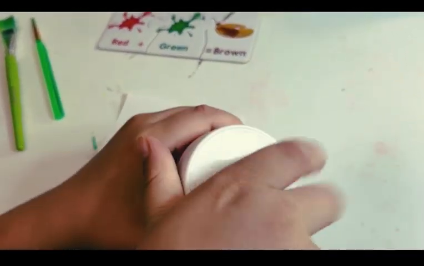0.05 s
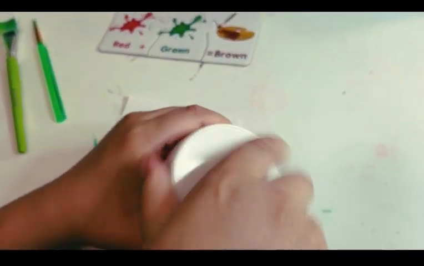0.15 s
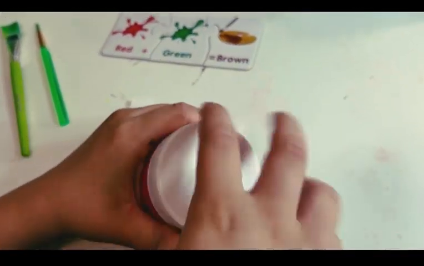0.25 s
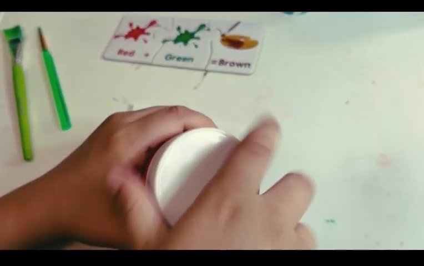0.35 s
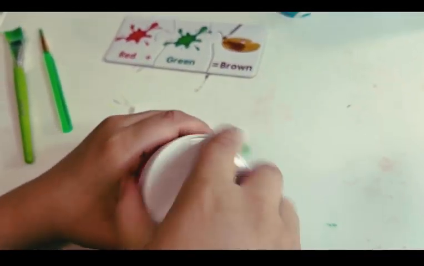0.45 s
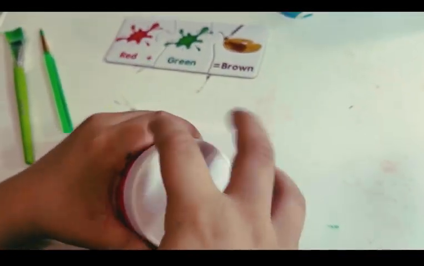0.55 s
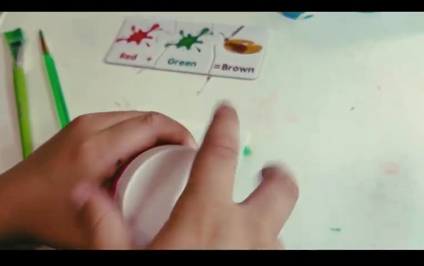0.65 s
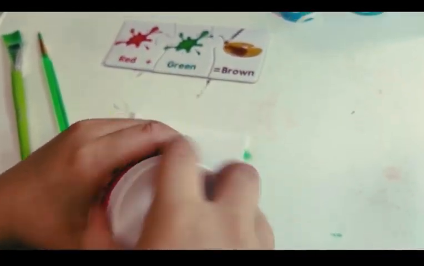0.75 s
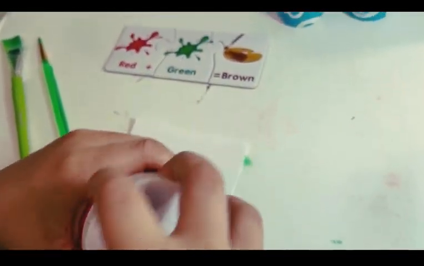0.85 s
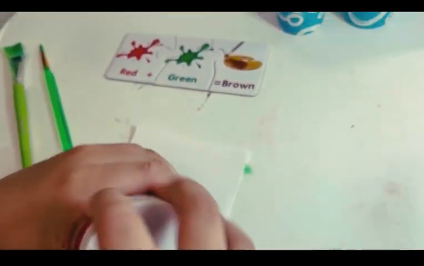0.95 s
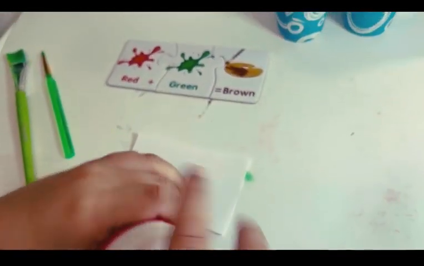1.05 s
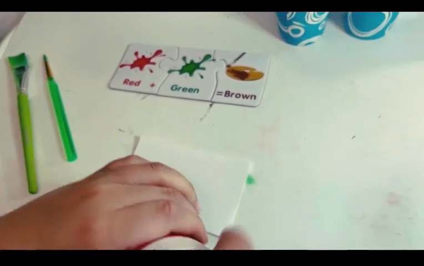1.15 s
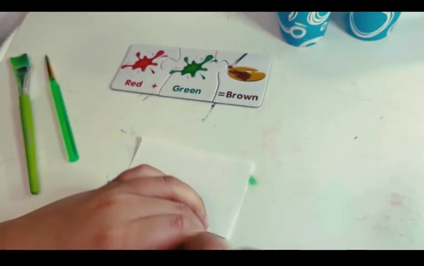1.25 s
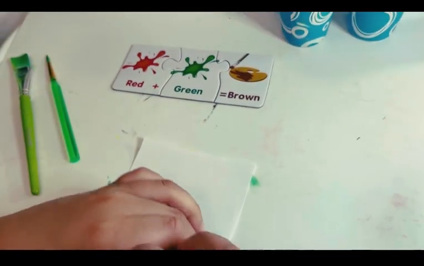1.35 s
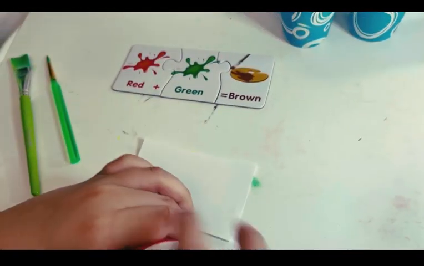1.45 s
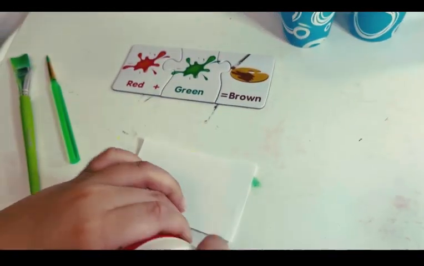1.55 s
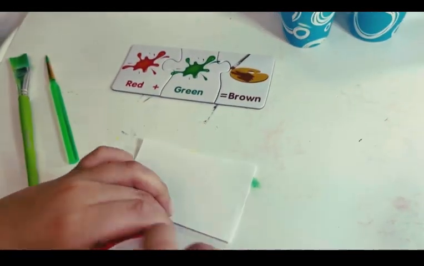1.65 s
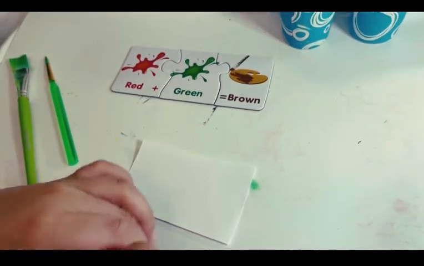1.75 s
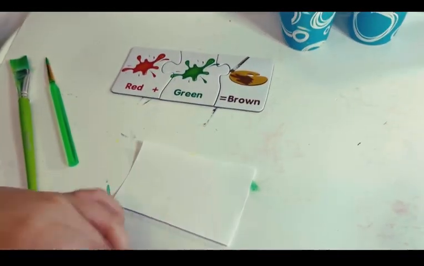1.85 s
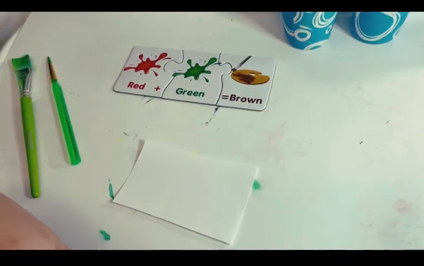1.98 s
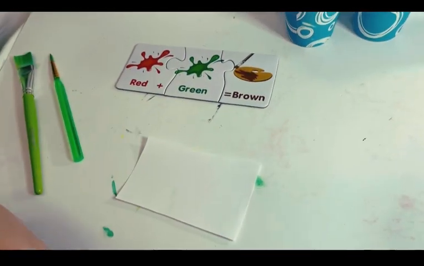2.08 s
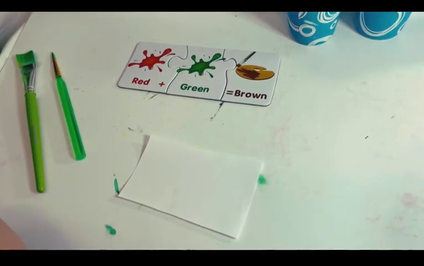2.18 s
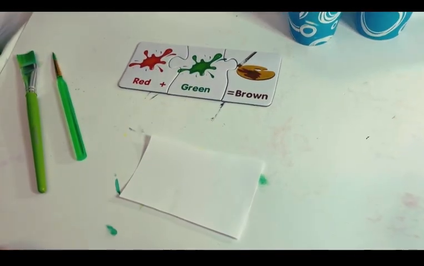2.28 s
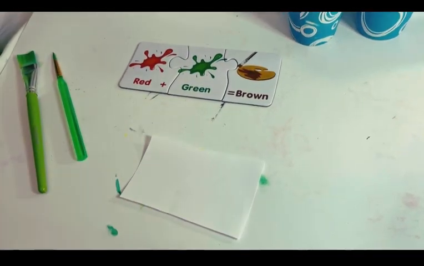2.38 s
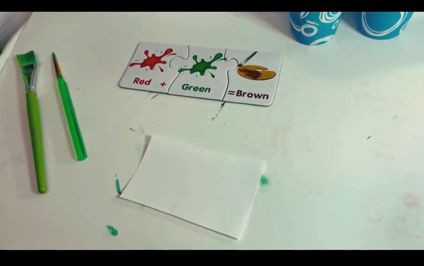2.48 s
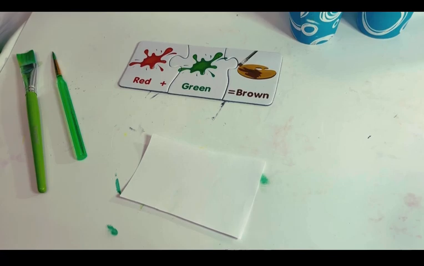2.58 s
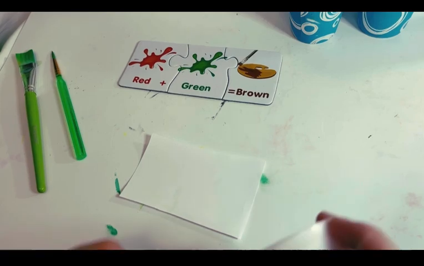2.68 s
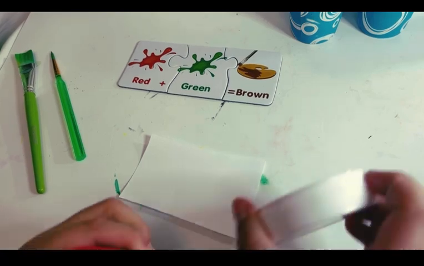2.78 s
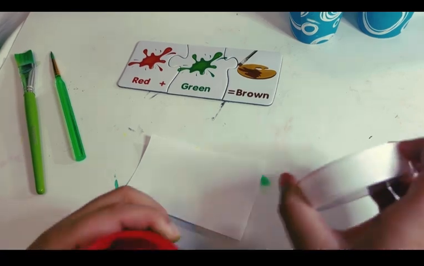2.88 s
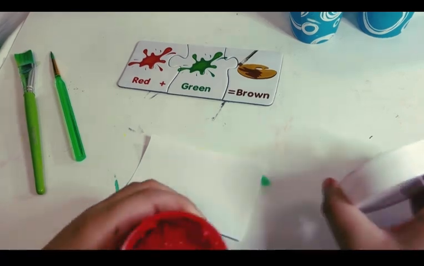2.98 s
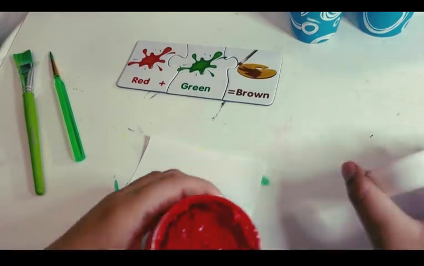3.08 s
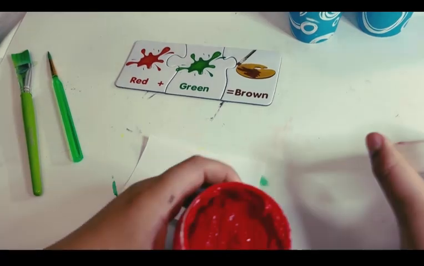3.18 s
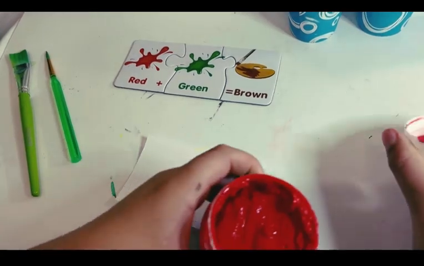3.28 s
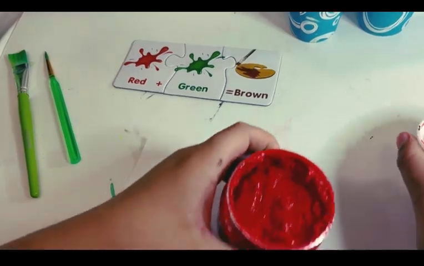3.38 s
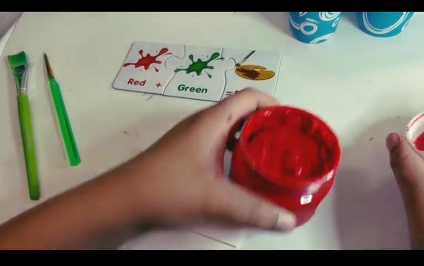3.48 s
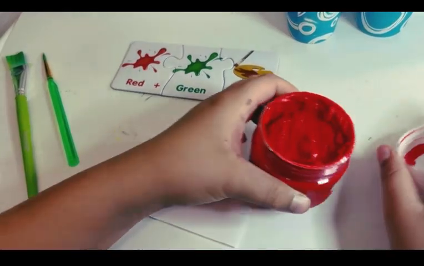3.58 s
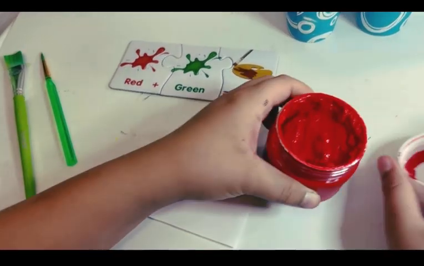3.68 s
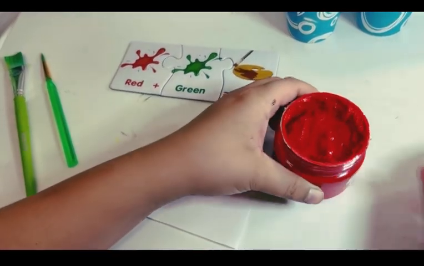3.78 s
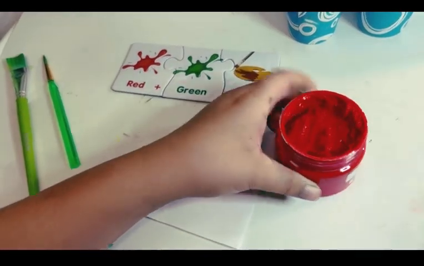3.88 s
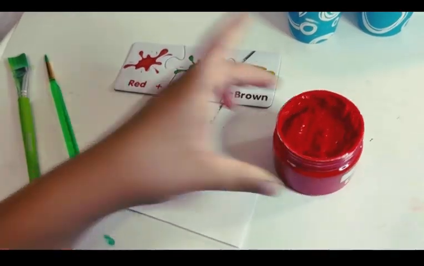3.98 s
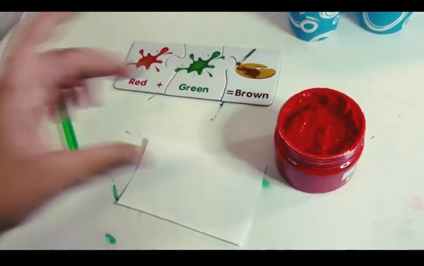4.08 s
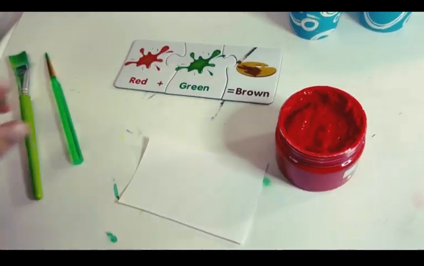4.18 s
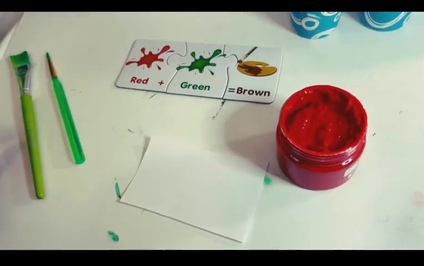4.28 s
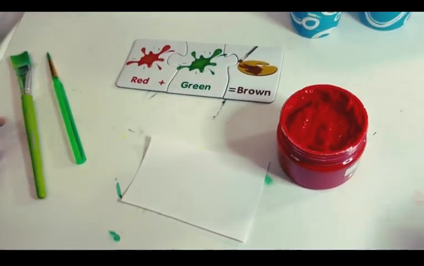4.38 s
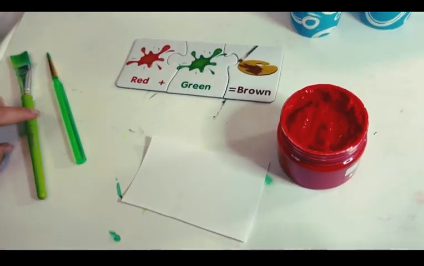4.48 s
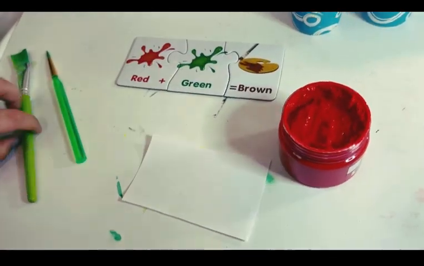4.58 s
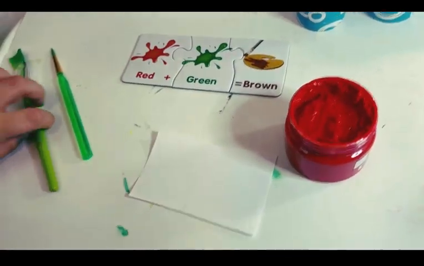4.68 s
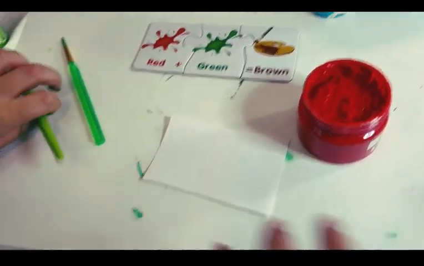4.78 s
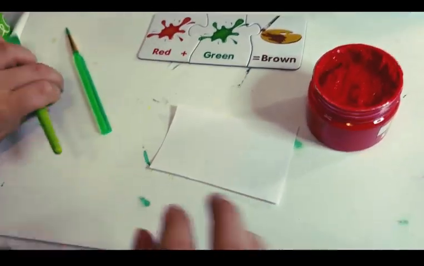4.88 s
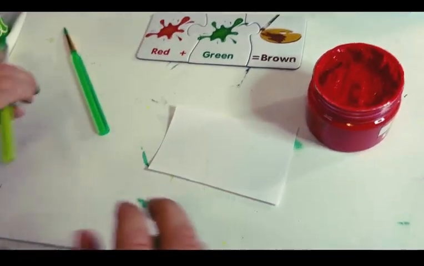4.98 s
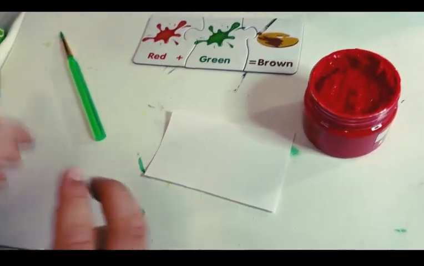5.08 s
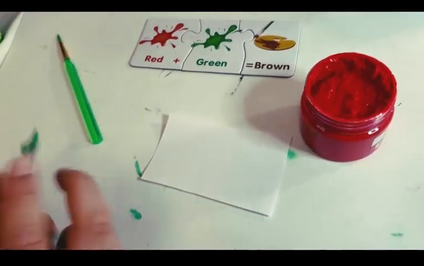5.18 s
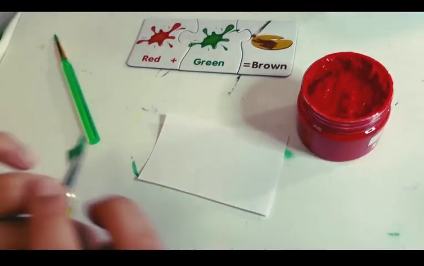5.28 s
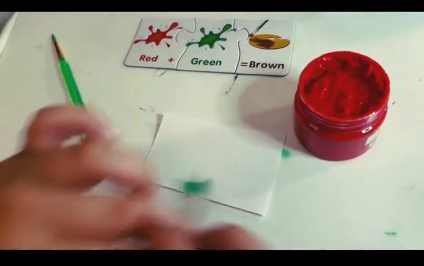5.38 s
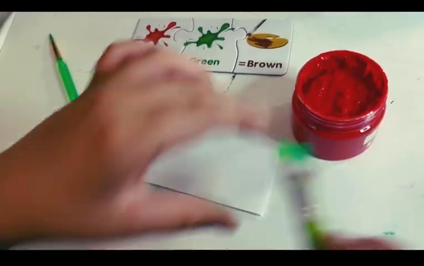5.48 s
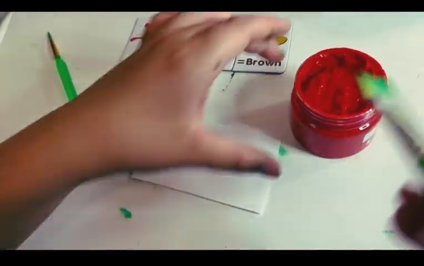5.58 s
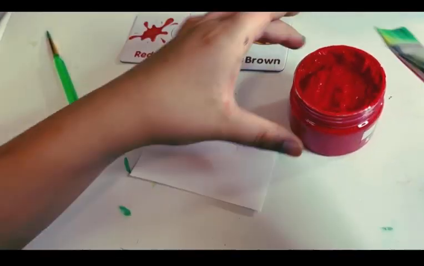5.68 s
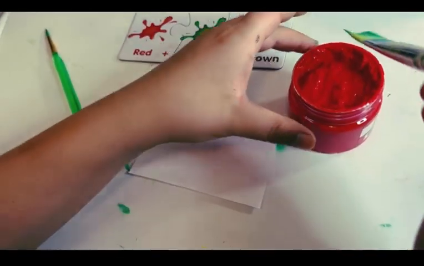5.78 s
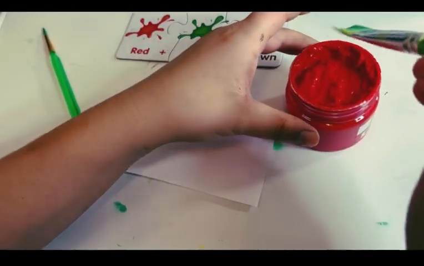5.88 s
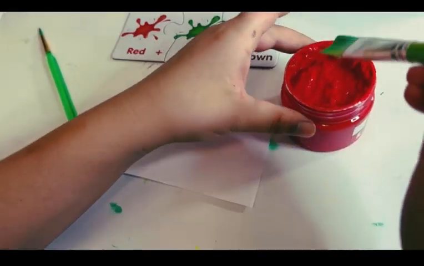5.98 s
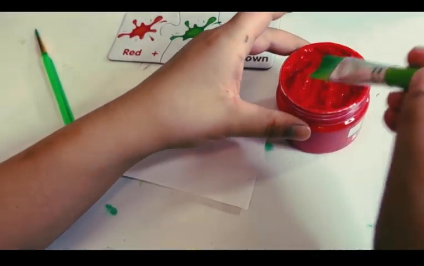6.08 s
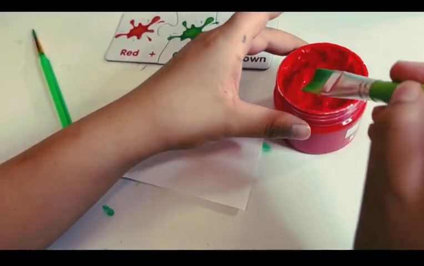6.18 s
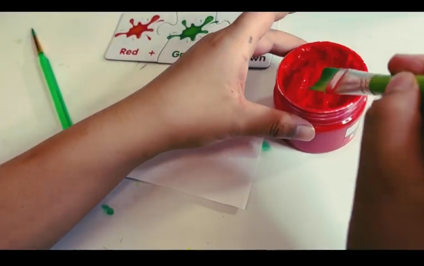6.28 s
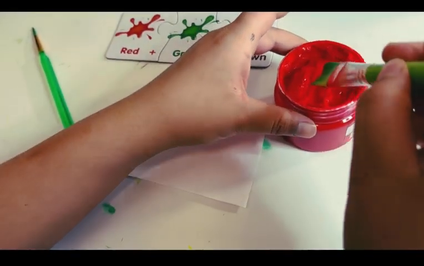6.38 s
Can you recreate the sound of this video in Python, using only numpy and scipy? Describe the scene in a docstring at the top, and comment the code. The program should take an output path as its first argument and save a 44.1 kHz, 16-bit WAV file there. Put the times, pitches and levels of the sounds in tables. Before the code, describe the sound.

Close, dry plastic snaps and thread rubbing as a jar lid is unscrewed, a short sticky crackle, then faint slides, taps and table bumps.

```python
"""Over quiet room tone the thread of a plastic screw lid rubs, then sticks and snaps free on a paint jar.
The jar stands on a table in a small room, close to a stereo microphone.
The lid peels off the wet rim with a short crackle; then hands slide over the table, the jar is set down
and a brush is picked up and dipped in. Rubs are coloured noise; snaps, pops, taps and knocks are
noise bursts and ringing modes, sent into the room."""
import sys
import numpy as np
from scipy import signal
from scipy.fft import rfft, irfft, next_fast_len
from scipy.io import wavfile

SR = 44100
rng = np.random.default_rng(int(sys.argv[2]) if len(sys.argv) > 2 else 0)


def to_wav(sig):
    """Store sig (one row per channel, or 1-D mono) as 16-bit WAV at the path in sys.argv[1].

    Samples outside -1..1 are clipped; the rate is SR.
    """
    pcm = np.clip(np.atleast_2d(sig), -1, 1) * 32767
    pcm = np.round(pcm).astype(np.int16)
    wavfile.write(sys.argv[1], SR, pcm.T)  # frames by channels


N = 284223
TIME = np.arange(N) / SR
FFT_SIZE = next_fast_len(N, real=True)
HZ = np.maximum(np.fft.rfftfreq(FFT_SIZE, 1 / SR), 1)
HIT_SIZE = 8192  # samples given to each short sound
HIT_TIME = np.arange(HIT_SIZE) / SR
HIT_HZ = np.maximum(np.fft.rfftfreq(HIT_SIZE, 1 / SR), 1)


def from_db(db):
    """Decibels to gain."""
    return 10 ** (np.asarray(db) / 20)


def rms_one(x):
    """Scale to rms 1."""
    return x / np.sqrt(np.mean(x ** 2) + 1e-20)


def burst_one(x):
    """Scale a short sound to the energy of 20 ms at rms 1."""
    return x / np.sqrt(np.sum(x ** 2) / (0.02 * SR))


def at_hz(points, hz):
    """Read a table on a log-frequency axis."""
    f, value = np.transpose(points)
    return np.interp(np.log(hz), np.log(f), value)


def resonances(modes, hz):
    """Magnitude response of (f/Hz, width/Hz, level/dB) resonances, summed in power."""
    power = 0
    for f, width, db in modes:
        detuning = (hz / f - f / hz) * f / width
        power = power + from_db(db) ** 2 / (1 + detuning ** 2)
    return np.sqrt(power)


def drift(rate_hz):
    """Slow random wander with spread 1, fading out above the rate."""
    spectrum = rfft(rng.standard_normal(FFT_SIZE)) / (1 + (HZ / rate_hz) ** 2)
    return rms_one(irfft(spectrum, FFT_SIZE)[:N])


def add(track, sound, s):
    """Mix a short sound in at time s."""
    i = max(round(s * SR), 0)
    track[..., i:i + sound.shape[-1]] += sound[..., :N - i]


# stereo width of diffuse sound at the microphone: f/Hz, side over mid level/dB
STEREO_WIDTH = [(60, -15.5), (200, -10.5), (400, -4.5), (700, -1), (1300, 0), (3000, -5), (4500, -4.5),
                (7000, 1), (14000, -4)]


def stereo_noise(colour, grain_db=0.0):
    """Coloured noise with its own width per frequency; grain makes it a stream of uneven tiny contacts."""
    contact_db = grain_db * np.clip(rng.standard_normal(N // 24 + 1), -3, 3)
    contact = np.repeat(from_db(contact_db), 24)[:N]  # each contact lasts 24 samples
    mid, side = rfft(rng.standard_normal((2, N)) * contact, FFT_SIZE) * colour
    side = side * from_db(at_hz(STEREO_WIDTH, HZ))
    mid, side = irfft([mid, side], FFT_SIZE)[:, :N]
    return np.array([mid + side, mid - side]) / np.std(mid)


def stroke(start, length, db, attack_s, release_s):
    """Gain of one movement of the hand: it swells, holds and dies away."""
    before = np.maximum(start - TIME, 0)
    after = np.maximum(TIME - start - length, 0)
    return from_db(db) * np.exp(-np.minimum(before / attack_s + after / release_s, 20))


def strokes(rows, attack_s, release_s):
    """Dull and bright gains of a series of movements; sharpness shifts weight from the one to the other."""
    dull = bright = 0
    for start, length, db, sharp_db in rows:
        gain = stroke(start, length, db, attack_s, release_s)
        dull = np.hypot(dull, gain / from_db(sharp_db))
        bright = np.hypot(bright, gain * from_db(sharp_db))
    return dull, bright


# colour of the quiet room, only its shape counts: f/Hz, level/dB
ROOM_TONE_COLOUR = [(15, -36.5), (25, -2.5), (80, 4), (270, -0.5), (405, -11.5), (624, -17.5),
                    (1160, -21.5), (1740, -28), (6210, -37.5), (7310, -40.5), (8360, -64), (9320, -35.5),
                    (11300, -34), (13600, -40), (16000, -65)]


def room_tone(level_db=-64.5, waver_db=1.5):
    """The quiet room under everything: coloured noise whose level wavers slightly."""
    colour = from_db(at_hz(ROOM_TONE_COLOUR, HZ))
    return from_db(level_db + waver_db * drift(8)) * stereo_noise(colour)


# turns of the lid by hand: start t/s, length t/s, pressure level/dB, sharpness level/dB
TURNS = [(0.0, 0.064, -70, 7), (0.12, .12, -60.5, 1), (0.291, 0.11, -74.5, 1), (0.484, 0.063, -52, 1),
         (0.575, .025, -60.5, -7.5), (0.70, 0.15, -60, -3), (0.955, 0.077, -63, -1),
         (1.161, 0.17, -59.5, -1), (1.383, .06, -67.5, -0.5), (1.602, .16, -61, 1),
         (1.787, 0.19, -71.5, 0.5), (2.192, 0.067, -74, 2)]
# hiss of the grinding thread, only its shape counts: f/Hz, level/dB
FRICTION_COLOUR = [(940, -30), (1600, -4), (2640, -3.5), (3920, -4), (6790, -2), (7690, -6), (8470, -19),
                   (9330, -4), (11400, -1.5), (14300, -10), (16000, -58.5)]
# ringing modes of the lid: f/Hz, level/dB, share of the ring time
LID_MODES = [(1160, -13.5, 0.29), (1232, -1, 2.7), (1309, 1.5, 1.5), (1295, -15, 3)]
# ringing modes of the jar on the table: f/Hz, level/dB, unstretched 60 dB decay t/s
JAR_MODES = [(166.7, -6, 0.0057), (261.6, -9, 0.13), (366.6, -6, .06), (440, 0.5, 0.013),
             (539.5, -1.5, 0.056), (677, 5.5, 0.025), (778, -0.5, 0.035), (920, -10, 0.016),
             (1030, -2.5, 0.06)]


def thread_friction(hiss_db=-3.5, lid_db=-3.0, body_db=-2.5, lid_width_hz=70, body_width_hz=70, stutter_db=2.5):
    """Between snaps the thread grinds unevenly and keeps lid and jar faintly ringing."""
    dull, bright = strokes(TURNS, attack_s=0.026, release_s=0.01)
    lid_colour = resonances([(f, lid_width_hz, db) for f, db, _ in LID_MODES], HZ)
    jar_colour = resonances([(f, body_width_hz, db) for f, db, _ in JAR_MODES], HZ)
    hiss_colour = from_db(at_hz(FRICTION_COLOUR, HZ))
    grinding = from_db(hiss_db) * bright * stereo_noise(hiss_colour, grain_db=4.5)
    grinding += from_db(lid_db) * dull * stereo_noise(lid_colour, grain_db=4.5)
    grinding += from_db(body_db) * dull * stereo_noise(jar_colour, grain_db=4.5)
    return from_db(stutter_db * drift(60)) * grinding


def small_slips(count=60, over_pressure_db=3.5, spread_db=2, lid_over_jar_db=-1):
    """During turns the thread slips at random, about as hard and sharply as it is being turned."""
    rows = []
    for k in range(count):
        start, length, pressure, sharpness = TURNS[k % len(TURNS)]
        force, edge, place = spread_db * np.clip(rng.standard_normal(3), -2, 2)
        s = start + length * rng.random()
        rows.append((s, pressure + over_pressure_db + force, sharpness + edge, place + lid_over_jar_db))
    return rows


def ring(modes, stretch, vary_db, detune=0.018):
    """Struck modes; place and grip change from blow to blow, and with them each mode's weight and pitch."""
    out = 0
    for f, db, t60 in modes:
        weight, pitch = rng.standard_normal(2)
        wave = np.sin(2 * np.pi * f * (1 + detune * pitch) * HIT_TIME)
        decay_db = -60 * HIT_TIME / max(t60 * stretch, 1e-3)
        out = out + from_db(db + vary_db * weight + decay_db) * wave
    # a small body radiates little outside the range of its modes
    band = [0.75 * modes[0][0], 1.3 * modes[-1][0]]
    radiation = signal.butter(2, band, "band", fs=SR, output="sos")
    return burst_one(signal.sosfilt(radiation, out + 1e-18))


# sharp resonances of the thread: f/Hz, width f/Hz, level/dB
THREAD_MODES = [(4572, 420, -5), (5070, 400, 0), (5430, 290, -0.5), (6250, 430, 2), (7030, 360, 2),
                (7500, 990, -1.5), (11060, 5200, -6), (12800, 1700, -3), (14100, 1100, -14)]


def crack(t60):
    """A slip: a burst of tiny fractures of contact through the thread's resonances; peak 1."""
    burst = rng.standard_normal(HIT_SIZE) * from_db(-60 * HIT_TIME / max(t60, 1e-3))
    out = 0
    for k, (f, width, db) in enumerate(THREAD_MODES):
        band = signal.lfilter(*signal.iirpeak(f, f / width, SR), burst + 1e-18)
        out = out + (-1) ** k * from_db(db) * band  # neighbours in opposite polarity
    return out / np.abs(out).max()


# ringing modes of the rim: f/Hz, level/dB, 60 dB decay t/s
RIM_MODES = [(1800, -4, 0.011), (2422, -1.5, .035), (2625, -2.5, .02), (2885, 3, 0.013), (3235, -1, 0.018),
             (3594, 2, 0.02), (3900, 3.5, 0.0087), (4380, 2, 0.014)]
# left microphone port against the right, for sounds from the jar: f/Hz, lead phase/rad
PORT_PHASE = [(100, 0), (860, 0.48), (1250, 0.32), (1700, 1.63), (4650, 1), (7000, -1), (11300, -6.5),
              (16000, -8.5)]
RIM_FOLLOWS_SHARPNESS = 0.064  # share of a hit's sharpness that reaches the rim
JAR_GROWTH, FIRM_HIT_DB = 0.77, -43.5  # the hand damps the jar: dB per dB of blow, around a firm hit


def plastic_hits(rows, crack_db, rim_db, lid_db, body_db, ring_t60, crack_t60, bend_ms, lag_ms,
                 low_pan_db, spread_db):
    """Sharp hits mostly crack, blunt ones ring the lid and knock the jar; bending waves bring the highs first."""
    out = np.zeros((2, N))
    sides = np.array([[0.5], [-0.5]])  # left, right
    # bending waves: the delay is bend_ms at 1 kHz and falls with the root of frequency
    travel = np.exp(-4j * np.pi * bend_ms / 1000 * np.sqrt(1000 * HIT_HZ))
    left_late = np.exp(-2j * np.pi * HIT_HZ * np.array([[lag_ms / 1000], [0]]))
    ports = np.exp(1j * at_hz(PORT_PHASE, HIT_HZ) * sides)
    for s, strength, sharpness, lid_over_jar in rows:
        peak = strength + sharpness
        rim = strength + RIM_FOLLOWS_SHARPNESS * sharpness
        blunt = strength - sharpness
        lid = blunt + lid_over_jar
        body = FIRM_HIT_DB + JAR_GROWTH * (blunt - lid_over_jar - FIRM_HIT_DB)
        low = from_db(lid + lid_db) * ring(LID_MODES, ring_t60, vary_db=2, detune=0.012)
        low += from_db(body + body_db) * ring(JAR_MODES, 1, vary_db=3.5, detune=0.03)
        # short waves scatter off the fingers and reach each side differently
        scatter = 2 * sides * from_db(spread_db) * crack(crack_t60)
        high = from_db(peak + crack_db) * (crack(crack_t60) + scatter)
        high += from_db(rim + rim_db) * ring(RIM_MODES, 1, vary_db=4, detune=0.012)
        low_spectrum = rfft(low * from_db(low_pan_db * sides)) * left_late
        high_spectrum = rfft(high * from_db(1 * sides))  # 1 dB to the left
        hit = irfft((low_spectrum + high_spectrum) * travel * ports)
        add(out, hit, s - bend_ms / 3000)  # early by the travel time at 9 kHz
    return out


# the thread sticks and snaps free: t/s, strength level/dB, sharpness level/dB, lid over jar level/dB
SNAPS = [(0.212, -45, 4, 7.5), (0.2264, -39, 5.5, 2.5), (0.4055, -40.5, 5.5, -2.5), (0.4539, -34, -5, -2),
         (0.4855, -40.5, 6, -3.5), (0.4986, -40.5, 5.5, 2.5), (0.5162, -37.5, 5, 6),
         (0.5285, -38, -6.5, -2), (0.5608, -50.5, 3, -3), (0.5733, -27.5, -5, 2), (0.5833, -36.5, -5, 6),
         (0.6791, -27, -0.5, -0.5), (0.7074, -28.5, -2, -2), (0.7904, -48.5, -9, 0.5),
         (0.8021, -43, 1.5, -3), (0.9393, -48.5, 16.5, -2.5), (0.9497, -49.5, 12.5, 0),
         (0.9706, -42.5, -5.5, -1.5), (0.9876, -43.5, -3, -3), (1.0275, -31.5, 0.5, 2.5),
         (1.1432, -28, 12.5, -3), (1.145, -21, -0.5, 2), (1.1901, -47, -6, -5.5), (1.2673, -35.5, 2, -3),
         (1.278, -39, 13.5, 7), (1.3547, -48.5, 13.5, -10), (1.37, -50, -9.5, -4.5),
         (1.4385, -47.5, -3.5, 0.5), (1.5307, -44.5, 1, -3), (1.5433, -25, 2, 2), (1.5678, -39.5, 4.5, 4),
         (1.6228, -44, 5, -4.5)]


def thread_snaps():
    """The stuck thread lets go in hard snaps, with small slips among them."""
    return plastic_hits(SNAPS + small_slips(), crack_db=-1.5, rim_db=-19.0, lid_db=-9.0, body_db=-10.5,
                        ring_t60=0.025, crack_t60=0.011, bend_ms=2.8, lag_ms=0.013,
                        low_pan_db=-2.5, spread_db=-5.5)


# 60 dB decay of the small room: f/Hz, t/s
ROOM_T60 = [(150, 0.25), (700, 0.37), (1400, 0.3), (5000, 0.25), (14000, 0.33)]


def room(dry, tail_db=-14.0, early_db=-11.0, early_t60=0.13, gap_s=0.0049):
    """Near surfaces answer within a few milliseconds, then the room dies away band by band."""
    t = np.arange(SR // 2) / SR
    hz = np.maximum(np.fft.rfftfreq(len(t), 1 / SR), 1)
    white = rfft(rng.standard_normal((2, len(t))))
    tail = 0
    edges = [0, 300, 900, 2000, 4000, 9000, SR]  # Hz
    for low, high in zip(edges, edges[1:]):
        band = irfft(white * ((hz >= low) & (hz < high)), len(t))
        tail = tail + band * from_db(-60 * t / at_hz(ROOM_T60, (low + high) / 2))
    early = rng.standard_normal((2, len(t))) * from_db(-60 * t / early_t60)
    answer = from_db(tail_db) * rms_one(tail) + from_db(early_db) * rms_one(early)
    mid, side = answer / np.sqrt(len(t))
    side = irfft(rfft(side) * from_db(at_hz(STEREO_WIDTH, hz)), len(t))
    response = np.pad([mid + side, mid - side], ((0, 0), (round(gap_s * SR), 0))) / np.sqrt(2)
    return signal.fftconvolve(dry, response, axes=1)[:, :N]


# fingertips and the jar's base skid with a faint pitch:
# middle t/s, length t/s, f/Hz, resonance width f/Hz (before squaring), level/dB
SKIDS = [(0.205, 0.059, 3940, 1500, -52.5), (1.274, 0.024, 10600, 4000, -47.5),
         (3.075, 0.098, 5330, 1500, -62), (3.609, 0.0047, 2560, 3000, -47.5),
         (3.757, 0.33, 2700, 900, -69.5), (4.372, 0.079, 2440, 690, -65), (4.48, 0.07, 4030, 900, -71),
         (4.592, 0.037, 4320, 1100, -63.5), (5.145, 0.068, 5970, 685, -80), (5.33, .06, 864, 197.6, -66.5),
         (5.642, 0.072, 10300, 1510, -72.5), (5.87, 0.16, 1340, 1300, -75.5), (6.338, .04, 860, 251, -75)]


def skids(grain_db=7.5):
    """Dry skin stutters over plastic and table in a narrow band."""
    out = 0
    for middle, length, f, width, db in SKIDS:
        swell = np.exp(-2 * ((TIME - middle) / length) ** 2)
        colour = resonances([(f, width, 0)], HZ) ** 2
        out = out + from_db(db) * swell * stereo_noise(colour, grain_db)
    return out


# wet paint tears between lid and rim: t/s, strength level/dB, sharpness level/dB, lid over jar level/dB
PEEL = [(2.2516, -34.5, 10.5, 0), (2.2537, -33.5, 7, 4), (2.2692, -31, -2.5, 0.5), (2.277, -29, 3, 1.5),
        (2.2865, -30, -1.5, 2.5), (2.294, -34.5, 3, 3)]


def peel_pops():
    """The louder pops as the lid comes off the wet rim."""
    return plastic_hits(PEEL, crack_db=-6.5, rim_db=-20.5, lid_db=-13.5, body_db=-17.5,
                        ring_t60=0.015, crack_t60=0.009, bend_ms=0.94, lag_ms=0.26,
                        low_pan_db=2.5, spread_db=0.0)


def wet_film(level_db=-41.5, fade_t60=0.097):
    """While the lid lifts, countless strands of paint burst between the pops, as grainy coloured noise."""
    start, end = PEEL[0][0], PEEL[-1][0]
    tearing = (TIME > start) * from_db(level_db - 60 * np.maximum(TIME - end, 0) / fade_t60)
    colour = resonances([(730, 93, 6), (1390, 380, 12), (2100, 900, -16), (3600, 450, 13),
                         (6120, 1800, -5.0), (11100, 3000, 10.0)], HZ)
    return tearing * stereo_noise(colour, grain_db=5.0)


# skin and jar slide over the table: start t/s, length t/s, level/dB, sharpness level/dB
SLIDES = [(2.52, 0.039, -72.5, 1.5), (2.645, 0.041, -68, 3.5), (2.9, 0.019, -65.5, 4.5),
          (3.03, 0.11, -61, -1), (3.23, 0.15, -65, 0), (3.48, 0.45, -65, -3.5), (3.6, 0.12, -67.5, -7),
          (4.12, 0.051, -73, 1), (4.33, 0.079, -63, -4.5), (4.47, 0.2, -75, 0.5), (4.78, 0.022, -70.5, 1),
          (5.205, 0.024, -76.5, 2.5), (5.34, 0.053, -77, 6), (5.49, 0.035, -80, -0.5),
          (5.69, 0.23, -78, 1.5), (6.21, 0.0058, -86, -10), (6.31, 0.012, -92, -10)]
# an arm brushes past: start t/s, length t/s, level/dB
SWISH = (5.46, 0.063, -56.5)
# colour of the soft rub, only its shape counts: f/Hz, level/dB
RUB_COLOUR = [(290, -41), (500, -4), (635, -14), (904, -3.5), (1000, -5.5), (1570, -0.5), (2260, -9.5),
              (2810, -1), (3680, -3.5), (6000, -10), (7800, -26.5), (13200, -120)]
# colour of the fine hiss on top, only its shape counts: f/Hz, level/dB
HISS_COLOUR = [(2650, -35), (4500, -12.5), (5480, -9.5), (7290, -10), (8150, -17), (10400, -4),
               (12700, -8.5), (14700, -13), (15500, -68), (16000, -57)]
SLIDE_ATTACK_S, SLIDE_RELEASE_S = 0.031, 0.033


def sliding(rub_db=-2.5, hiss_db=-1.0, swish_db=-5.0, stutter_db=1.9):
    """Hands, jar and arm slide about: a soft, unsteady rub with a fine hiss on top."""
    dull, bright = strokes(SLIDES, SLIDE_ATTACK_S, SLIDE_RELEASE_S)
    rub = stereo_noise(from_db(at_hz(RUB_COLOUR, HZ)))
    hiss = stereo_noise(from_db(at_hz(HISS_COLOUR, HZ)), grain_db=-1.0)
    out = from_db(rub_db + stutter_db * drift(32)) * dull * rub
    out += from_db(hiss_db + stutter_db * drift(68)) * bright * hiss
    swish = stereo_noise(resonances([(433.0, 290, 0)], HZ) ** 2, grain_db=4.5)
    return out + from_db(swish_db) * stroke(*SWISH, SLIDE_ATTACK_S, SLIDE_RELEASE_S) * swish


# jar, lid and brush are tapped in handling:
# t/s, strength level/dB, sharpness level/dB, lid over jar level/dB
TAPS = [(2.9776, -56.5, 4, 1.5), (3.0691, -62.5, -7, -10.5), (3.3064, -56, 4.5, 10),
        (3.3297, -48, -2.5, 7.5), (3.6063, -50.5, -2, -3), (4.3208, -53.5, -10.5, -7.5),
        (4.4133, -51.5, 2.5, -5.5), (4.6012, -50.5, 9, 4.5), (4.8017, -64, 14.5, 6),
        (5.3999, -63.5, 17.5, -2), (5.4969, -64, -7.5, -8), (6.201, -64, 1.5, 2)]


def handling_taps():
    """Light taps of jar, lid and brush, from the same cracks and ringing modes as the snaps."""
    return plastic_hits(TAPS, crack_db=2.5, rim_db=-11.0, lid_db=-11.0, body_db=-15.5,
                        ring_t60=0.031, crack_t60=0.0055, bend_ms=2.52, lag_ms=0.013,
                        low_pan_db=-7.0, spread_db=-8.5)


# soft bumps on the table top: t/s, level/dB before the common bump_db
BUMPS = [(3.782, -43.5), (3.841, -48), (3.937, -43.5), (4.297, -45), (4.423, -46), (5.501, -52.5)]
# an arm drags and makes the table top judder: start t/s, length t/s, level/dB
DRAG = (4.13, 0.69, -57.5)


def table_top(bump_db=7.0, bump_hz=54, start_hz=130, glide_s=0.008, bump_t60=0.19, rise_s=0.0033):
    """A soft bump sinks in pitch to the table's lowest mode; a dragging arm makes a higher mode judder."""
    out = np.zeros(N)
    pitch = bump_hz + (start_hz - bump_hz) * np.exp(-HIT_TIME / glide_s)
    swell = from_db(-60 * HIT_TIME / bump_t60) * (1 - np.exp(-HIT_TIME / rise_s))
    bump = np.sin(2 * np.pi * np.cumsum(pitch) / SR) * swell
    for s, db in BUMPS:
        add(out, from_db(db + bump_db) * bump, s)
    judder = stereo_noise(resonances([(119.8, 22.0, 0)], HZ) ** 2)
    return out + stroke(*DRAG, SLIDE_ATTACK_S, SLIDE_RELEASE_S) * judder


# the jar's base settles on the table: t/s, dull knock level/dB, upper knock level/dB, before the common trims
KNOCKS = [(4.075, -47.5, -70), (4.082, -47, -71), (4.124, -37, -50)]


def knocks(knock_db=-9.5, upper_db=-6.0, soft_hz=380, stretch=1.6):
    """The jar's base meets the table softly: mostly its low modes answer."""
    out = np.zeros(N)
    soft_contact = signal.butter(4, soft_hz, fs=SR, output="sos")
    for s, db, upper in KNOCKS:
        # all but the lowest mode of the jar
        dull = burst_one(signal.sosfilt(soft_contact, ring(JAR_MODES[1:], stretch, vary_db=1.5)))
        tap = ring(LID_MODES, 0.028, vary_db=1)
        add(out, from_db(db + knock_db) * dull + from_db(upper + upper_db) * tap, s)
    return out


def scene():
    """Snaps, peel, taps and knocks sound into the room, over friction, handling and room tone."""
    hits = thread_snaps() + peel_pops() + handling_taps() + knocks()
    rubbing = thread_friction() + skids() + wet_film() + sliding()
    return room_tone() + hits + room(hits) + rubbing + table_top()


def record(dry, notch_hz=8400, notch_width_hz=800, low_cut_hz=30, cutoff_hz=16200):
    """The microphone loses the deepest bass, has a notch in the treble, and the top is cut."""
    notch = signal.iirnotch(notch_hz, notch_hz / notch_width_hz, SR)
    coloured = signal.lfilter(*notch, signal.lfilter(*notch, dry))  # twice, for a wider notch
    low_cut = signal.butter(2, low_cut_hz, "high", fs=SR, output="sos")
    top_cut = signal.cheby2(14, 60, cutoff_hz, fs=SR, output="sos")  # 60 dB down from the cutoff up
    return signal.sosfilt(top_cut, signal.sosfilt(low_cut, coloured))


dry = scene()
out = record(dry)
to_wav(out)
```